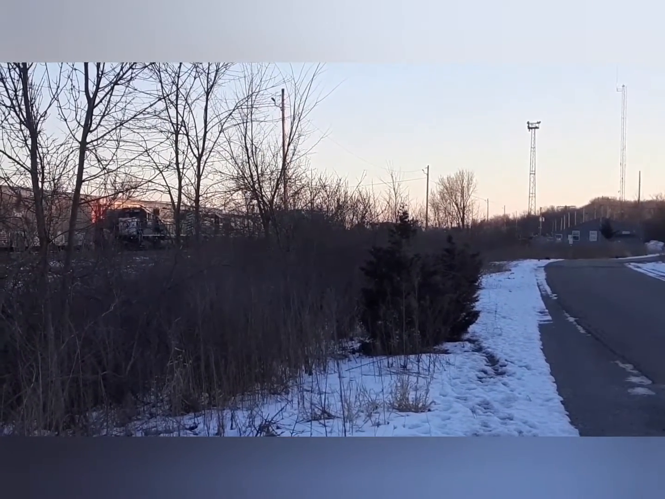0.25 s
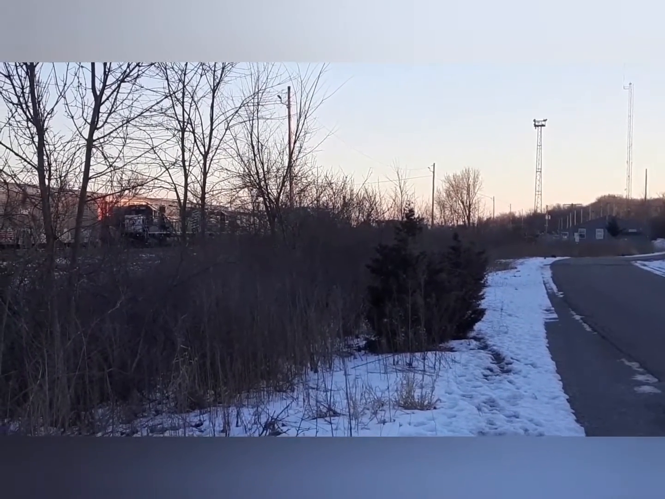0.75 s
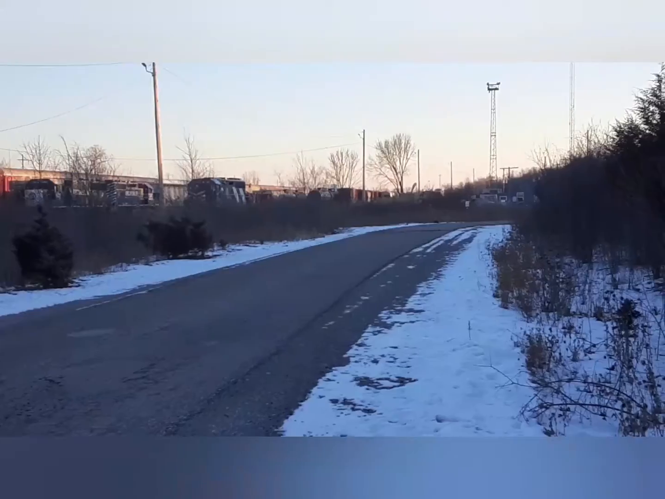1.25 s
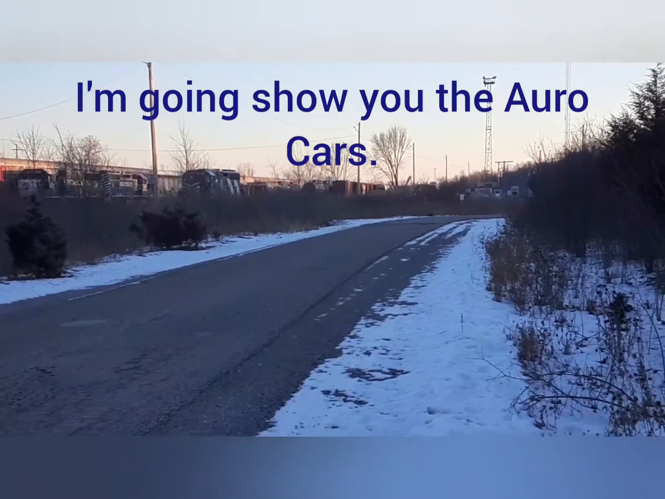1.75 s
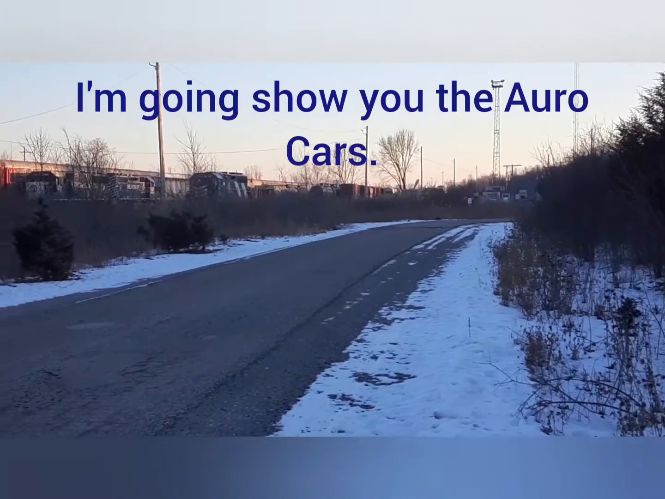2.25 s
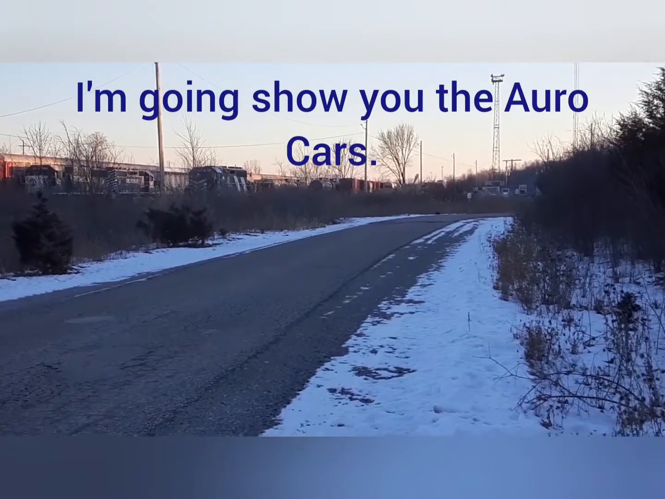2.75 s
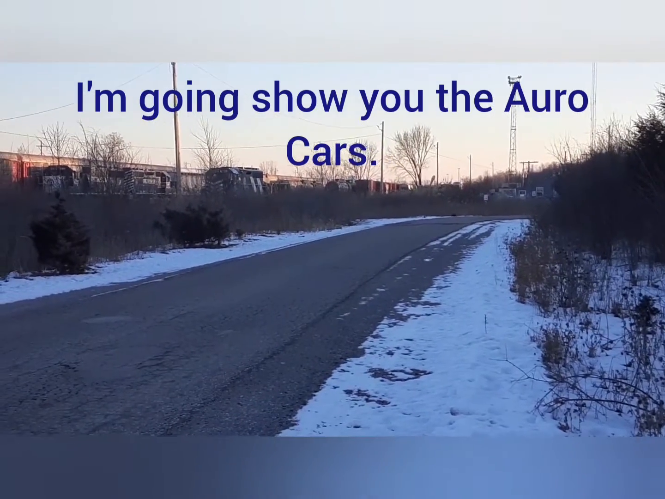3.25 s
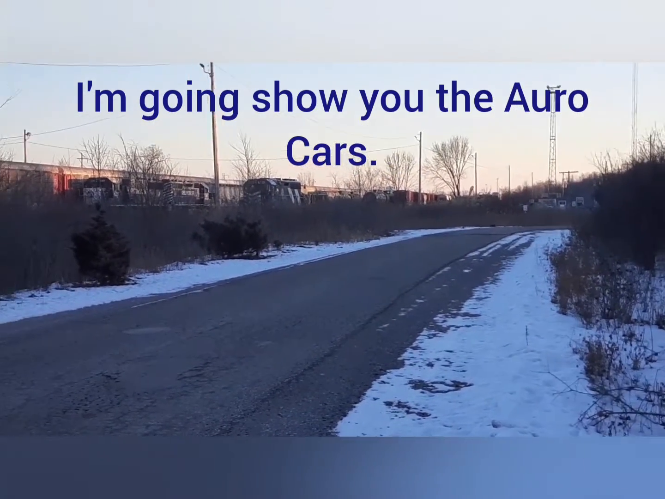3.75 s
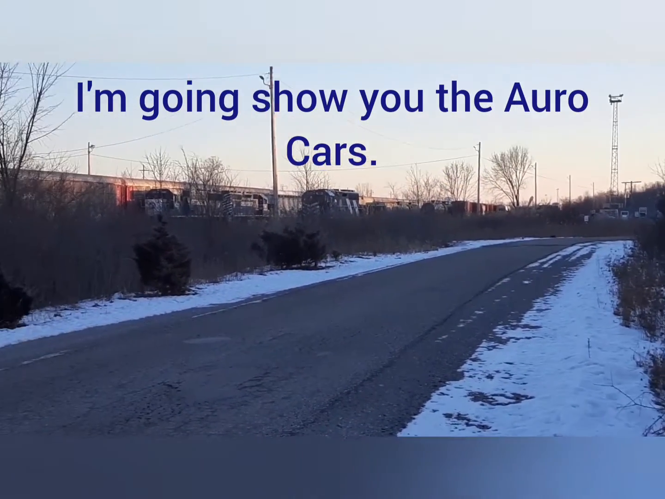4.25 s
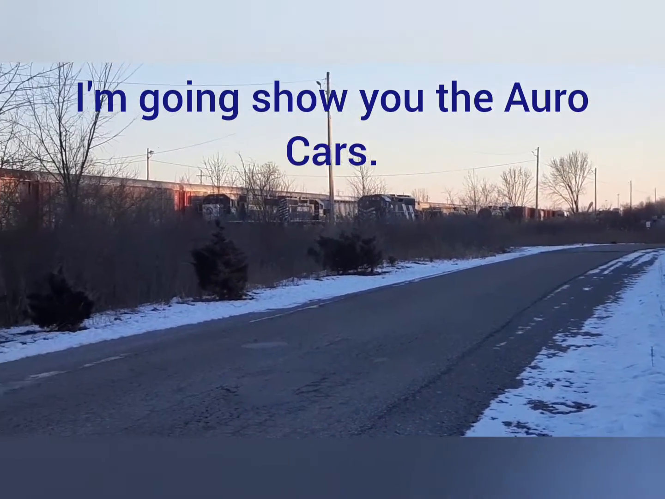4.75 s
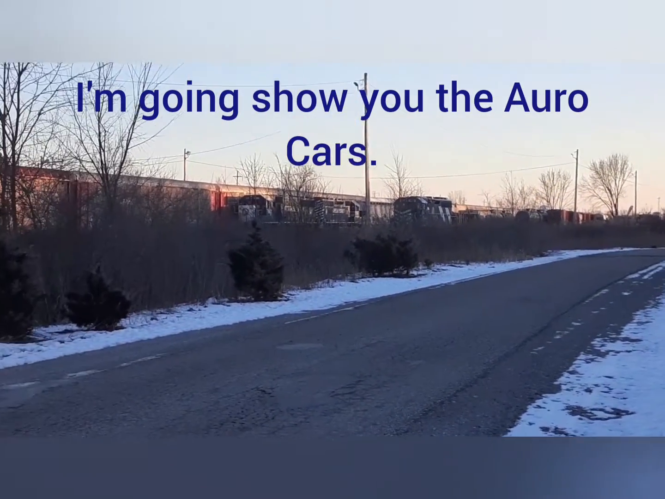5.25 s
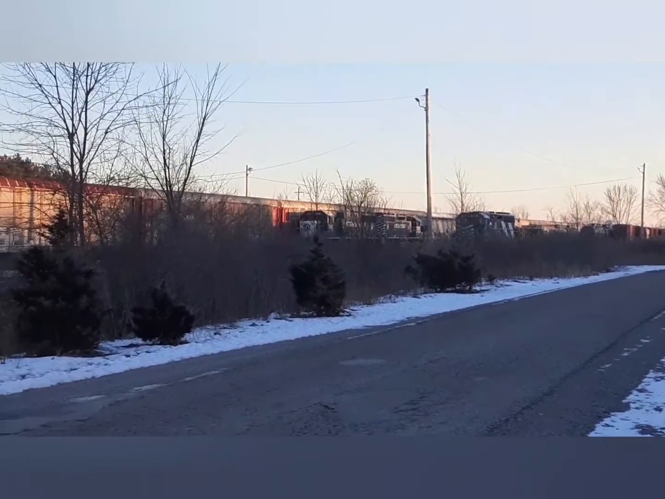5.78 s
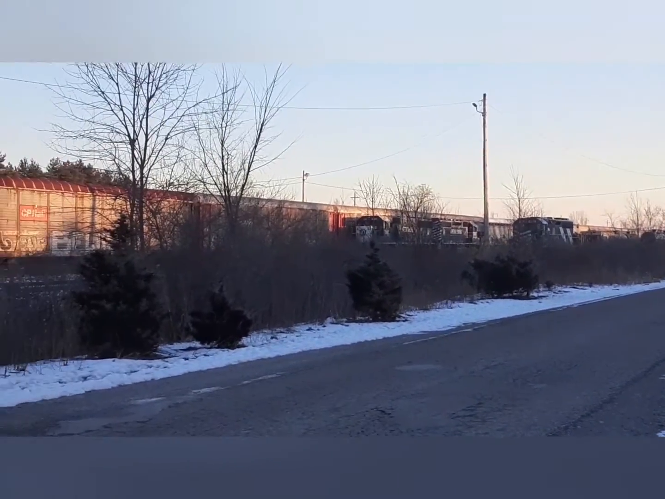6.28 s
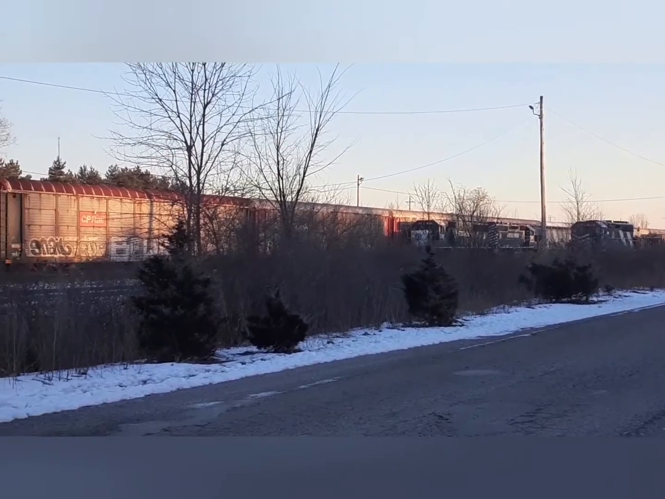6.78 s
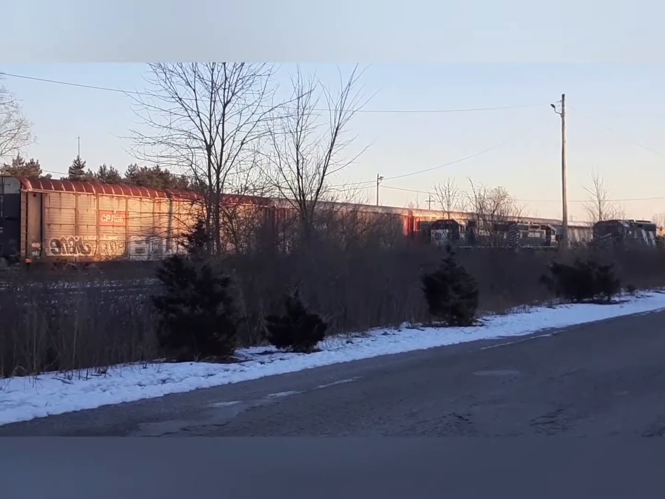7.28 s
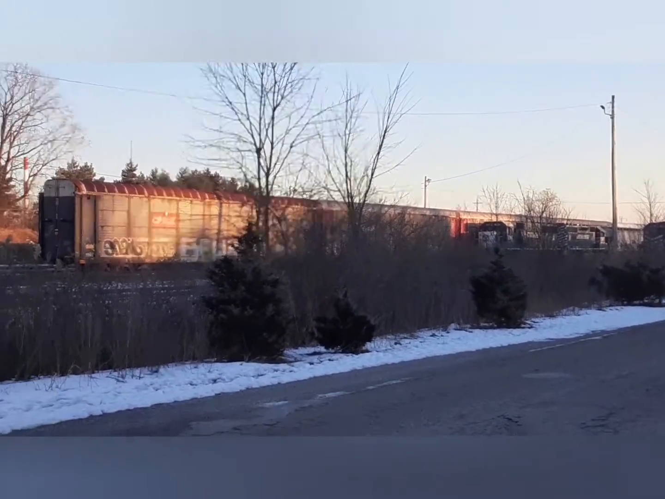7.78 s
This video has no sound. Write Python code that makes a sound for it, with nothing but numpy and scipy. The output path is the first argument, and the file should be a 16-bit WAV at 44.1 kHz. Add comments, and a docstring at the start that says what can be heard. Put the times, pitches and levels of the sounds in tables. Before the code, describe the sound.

Two diesel locomotives idle some way off with a deep, beating throb, light clatter and thin high whines.

```python
"""Two diesel locomotives idling in an open rail yard

Some way off, their exhaust notes beat against each other in a slow throb, the stacks bark and the
firings clatter. Gears, turbocharger, blower, alternator and pump whine over a rush of cooling air.
The microphone listens from one spot, then from a second, where it slowly turns."""
import sys
import numpy as np
from scipy import signal
from scipy.fft import rfft, irfft, next_fast_len
from scipy.io import wavfile

SR = 44100
rng = np.random.default_rng(int(sys.argv[2]) if len(sys.argv) > 2 else 0)


def wav_record(signal):
    """Record a signal, one row per channel, as 16-bit PCM in the file named by sys.argv[1]."""
    frames = np.transpose(np.atleast_2d(signal))
    bounded = np.clip(frames, -1, 1)
    # unit amplitude maps onto the largest positive 16-bit level
    quanta = np.round(bounded * 32767).astype(np.int16)
    wavfile.write(sys.argv[1], SR, quanta)


N = 353682

FAST_CRANK_HZ, SLOW_CRANK_HZ = 6.3212, 5.3108
JUMP_S, BLEND_S, TURN_S = 1.25, .08, 3.5   # the microphone changes spot, later starts to turn
OPENING_DB, OPENING_RISE_S = -3, (.42, .488)


def from_db(db):
    """Decibels to gain."""
    return 10 ** (np.asarray(db) / 20)


def rms_one(x):
    """Scale to rms 1."""
    return x / np.sqrt(np.mean(np.abs(x) ** 2) + 1e-20)


def seconds():
    """The time of every sample."""
    return np.arange(N) / SR


def in_time(rows):
    """One curve for each column after the time."""
    s, *columns = np.transpose(rows)
    return [np.interp(seconds(), s, c) for c in columns]


def swell(s, half_s):
    """A bell-shaped rise and fall of height 1."""
    return np.exp(-((seconds() - s) / half_s) ** 2)


def drift(rate):
    """A random wander of rms 1, changing about rate times a second."""
    pole = np.exp(-40 * np.pi * rate / SR)
    slow = signal.lfilter([1], [1, -2 * pole, pole * pole], rng.standard_normal(N // 20 + 4002))[4000:]
    return np.interp(np.arange(N) / 20, np.arange(len(slow)), rms_one(slow))


def on_bins(points):
    """A table over log frequency, read at every spectral bin."""
    hz, value = np.transpose(points)
    bins = np.fft.rfftfreq(next_fast_len(N), 1 / SR)
    return np.interp(np.log(bins + 1), np.log(hz), value)


def coloured(x, spectrum):
    """Give a signal a spectrum; rms 1."""
    size = next_fast_len(N)
    return rms_one(irfft(rfft(x, size) * from_db(on_bins(spectrum)), size)[..., :N])


def arrived():
    """0 at the first spot, 1 at the second."""
    return np.interp(seconds(), [JUMP_S, JUMP_S + BLEND_S], [0, 1])


def turned():
    """How far the microphone has turned, 0-1."""
    return np.interp(seconds(), [TURN_S, N / SR], [0, 1])


def heard(at_mic, lateness=1):
    """Level and pan (left over right) in dB from three rows: first spot, second spot, end of the turn."""
    first, second, last = np.array(at_mic)[:, :, None]
    level_db, pan_db = first + (second - first) * arrived() + (last - second) * turned() ** lateness
    return level_db + np.interp(seconds(), OPENING_RISE_S, [OPENING_DB, 0]), pan_db


def panned(x, pan_db):
    """Share a level difference between left and right."""
    return x * from_db(pan_db * np.array([[.5], [-.5]]))


def placed(x, at_mic, rise_db=0, lateness=1):
    """Set a sound's level and side at the microphone, with a passing rise on top."""
    level_db, pan_db = heard(at_mic, lateness)
    return panned(x * from_db(level_db + rise_db), pan_db)


def lagged(pair, lag_ms):
    """Sound reaches the left of the microphone later by lag_ms."""
    t = seconds()
    return np.array([np.interp(t - lag_ms / 1000, t, pair[0]), pair[1]])


# the yard's diffuse sound, left against right (frequency [Hz], likeness [0-1])
LIKENESS = [(60, 0.63), (160, 0.94), (290, 0.86), (640, 0.83), (1400, 0.26), (3000, 0.5), (7000, 0.48),
            (15000, 0)]


def diffuse():
    """White noise from all round, alike on both sides in the bass, less so in the treble."""
    size, alike = next_fast_len(N), np.clip(on_bins(LIKENESS), 0, 1)
    mid, side = rfft(rng.standard_normal((2, size)))
    pair = np.sqrt(1 + alike) * mid + np.sqrt(1 - alike) * side * [[1], [-1]]
    return rms_one(irfft(pair, size)[:, :N])


# swells of the treble (time [s], half length [s], rise [dB])
SWELLS = [(1.8, 0.43, 3.5), (7.1, 0.59, 5)]


def treble_swells():
    """The treble comes up twice; its rise in dB."""
    return sum(db * swell(s, half_s) for s, half_s, db in SWELLS)


# microphone hiss (frequency [Hz], level [dB]) and its balance (level [dB], pan [dB])
HISS = [(7000, -37), (9800, -20), (11000, -8.5), (13500, -7.5), (15700, -3.5), (17000, -2)]
HISS_AT_MIC = [(-58.5, -1), (-57.5, -3), (-59, -6.5)]


def microphone_hiss(treble_db):
    """Thin noise at the very top, behind everything."""
    return placed(coloured(diffuse(), HISS), HISS_AT_MIC, treble_db)


# cooling air and its thin top (frequency [Hz], level [dB]); at the microphone (level [dB], pan [dB])
AIR = [(900, 3), (1800, 0.5), (2100, 8), (2400, 0.5), (2750, 1.5), (3500, 0), (4300, -1), (5100, -2),
       (6000, -2), (6500, -16.5), (7400, -26), (8300, -41), (9500, -52), (12000, -39)]
SIZZLE = [(4500, -5), (5800, -13.5), (6500, 2.5), (7400, 5.5), (8300, -8.5), (9500, -15), (12000, -34)]
AIR_AT_MIC = [(-54, -1.5), (-52, 0), (-48.5, -3)]
SIZZLE_AT_MIC = [(-70, 14), (-66, 6), (-65.5, 5)]


def cooling_air(treble_db):
    """Moving air rushes smoothly across the yard."""
    rush = placed(coloured(diffuse(), AIR), AIR_AT_MIC, lateness=4)
    return rush + placed(coloured(diffuse(), SIZZLE), SIZZLE_AT_MIC, .85 * treble_db)


# faint rasps nearby (time [s], half length [s], pitch [Hz], level [dB])
RASPS = [(.16, 0.15, 2530, -57.5), (0.346, 0.052, 2600, -54.5), (.8, 0.038, 2530, -54),
         (1.12, 0.32, 3020, -62)]


def rasps(width_hz):
    """Short swells of narrow noise."""
    out = np.zeros((2, N))
    for s, half_s, hz, db in RASPS:
        band = signal.butter(2, [hz - width_hz / 2, hz + width_hz / 2], "band", fs=SR, output="sos")
        out += from_db(db) * swell(s, half_s) * rms_one(signal.sosfilt(band, rng.standard_normal((2, N))))
    return out


# a short click as the listening spot changes, and a like one later (time [s], unfiltered level [dB])
TICKS = [(1.27, -35), (4.037, -35)]


def ticks(decay_s):
    """Very short, dull cracks."""
    out = np.zeros(N)
    for s, db in TICKS:
        age = seconds() - s
        out += from_db(db) * (age >= 0) * np.exp(-np.abs(age) / decay_s) * rng.standard_normal(N)
    return signal.sosfilt(signal.butter(2, [1100, 3000], "band", fs=SR, output="sos"), out)


def whine(tones, level_db, pan_db, lag_ms, steady, scatter):
    """Tones that waver over their line width; scattered paths make each side flutter on its own."""
    out, t = np.zeros((2, N)), seconds()
    arrival = np.array([t - lag_ms / 1000, t])
    flutter = 1 + scatter * np.array([drift(15) + 1j * drift(12) for side in range(2)])
    for hz, db, width in tones:
        clean = steady / width   # narrow lines are nearly pure, wide ones are a rush
        wavering = rms_one(clean + drift(width * .54) + 1j * drift(width * 1.25)) * rms_one(flutter)
        phase = 2 * np.pi * (hz * arrival % 1)
        out += from_db(db) * (wavering.real * np.cos(phase) - wavering.imag * np.sin(phase))
    return np.sqrt(2) * panned(out * from_db(level_db), pan_db)


# pump tones (pitch [Hz], level [dB], width [Hz]); at the microphone (level [dB], pan [dB])
PUMP_TONES = [(1499.5, -5, 6), (1533, -6.5, 7), (1525, -4, 170), (1680, -15, 12)]
PUMP_AT_MIC = [(-53.5, 2.4), (-52.7, 2.5), (-49, 2)]


def pump(lag_ms):
    """The pump whines on close tones in a narrow rush."""
    return whine(PUMP_TONES, *heard(PUMP_AT_MIC), lag_ms - .03, steady=21, scatter=.093)


# alternator tones (pitch [Hz], level [dB], width [Hz]); at the microphone (level [dB], pan [dB])
ALTERNATOR_TONES = [(999, -1, 3), (1259, -11, 9), (3505, -23, 4)]
ALTERNATOR_AT_MIC = [(-50.5, 3), (-47.5, 1), (-54, 4)]


def alternator(lag_ms):
    """A nearly pure whine that fades as the microphone turns."""
    return whine(ALTERNATOR_TONES, *heard(ALTERNATOR_AT_MIC), 2 * lag_ms - .15, steady=22, scatter=.11)


# blower tones (pitch [Hz], level [dB], width [Hz])
BLOWER_TONES = [(1824, -.5, 2)]
BLOWER_OVERTONES = [(2736, -3.5, 2), (3648, -6.5, 2), (2750, -1, 260)]
# at the microphone: its note (level [dB], pan [dB]), its overtones (time [s], level [dB], pan [dB])
BLOWER_AT_MIC = [(-60, 0), (-63.5, 2), (-53.5, 13)]
OVERTONE_LEVEL = [(0, -73.5, -6), (1.8, -64.0, -2), (3.5, -59.5, 1), (6.1, -68.5, -7), (7.3, -58, -3.5),
                  (8.02, -58, -2)]


def blower(lag_ms):
    """The blower's note grows on the left with the turn; its overtones come and go."""
    note = whine(BLOWER_TONES, *heard(BLOWER_AT_MIC, lateness=.6), lag_ms + .13, steady=16, scatter=.1)
    return note + whine(BLOWER_OVERTONES, *in_time(OVERTONE_LEVEL), lag_ms + .047, steady=8.1, scatter=.16)


# turbocharger tones (pitch [Hz], level [dB], width [Hz]); at the microphone (level [dB], pan [dB])
TURBO_TONES = [(4511, -8, 12), (4555, -10.5, 9), (4500, -5, 110), (6042, -19, 5), (7073, -19.5, 4)]
TURBO_AT_MIC = [(-55, -3), (-58.5, -2), (-53.5, -5)]


def turbocharger(lag_ms):
    """A high whistle that fades in and out by chance."""
    level_db, pan_db = heard(TURBO_AT_MIC)
    return whine(TURBO_TONES, level_db + 2.4 * drift(1.5), pan_db, lag_ms - .04, steady=16, scatter=.14)


# gear tones and their octave (pitch [Hz], level [dB], width [Hz])
GEAR_TONES = [(5358, 1, 2), (5307.5, -9.5, 3), (5408.5, -17, 5), (5256, -19, 6), (5350, -7, 110)]
GEAR_OCTAVE = [(10716, -6, 5), (10716, -1.5, 150)]
# at the microphone (time [s], level [dB], pan [dB]); their direction (time [s], left lag [ms])
GEAR_LEVEL = [(0, -55.0, 0), (0.55, -58.0, -1), (0.95, -53.0, -2), (1.25, -54.5, -2), (1.6, -48.0, -1),
              (2.15, -44.0, -1), (2.55, -50.5, 2), (3.6, -53.0, -3), (4.45, -48.0, 0), (5.4, -50.5, 2),
              (6.15, -46.5, 2), (6.6, -50.5, -7), (7.05, -43.5, -6), (7.6, -43.5, -9), (8.02, -49.5, -14)]
GEAR_LAG = [(0, -.06), (2.3, -.04), (2.7, -.14), (3.7, -.11), (4.1, .01), (8.02, .135)]


def gears(lag_ms, treble_db):
    """The gear whine swells, fades and wanders in direction, with a faint octave above."""
    level_db, pan_db = in_time(GEAR_LEVEL)
    note = whine(GEAR_TONES, level_db, pan_db, *in_time(GEAR_LAG), steady=8.4, scatter=.3)
    octave_db = level_db - 21 + .34 * treble_db
    return note + whine(GEAR_OCTAVE, octave_db, 2.5, lag_ms + .027, steady=9.6, scatter=.31)


def crank(hz, starts_s, hunt):
    """Crank angle in turns as heard at each spot; the governor lets it run slightly ahead and behind."""
    return hz * (seconds() - np.array(starts_s)[:, None]) + hunt * drift(1.5)


def firings(angle, crank_hz, uneven_db, decay, fresh, count):
    """Each cylinder fires a burst that is the same on every turn, mixed with fresh turbulence."""
    slot = angle % 1 * count
    strength = from_db(uneven_db * rms_one(rng.standard_normal(count)))[slot.astype(int) % count]
    burst = strength * np.exp(-(slot % 1) / decay)
    one_turn = rng.standard_normal(int(SR / crank_hz))
    repeating = one_turn[(angle % 1 * (len(one_turn) - 1)).astype(int)]
    return rms_one(burst * (repeating + fresh * diffuse()))


# block clatter (frequency [Hz], level [dB]); at the microphone (level [dB], pan [dB])
CLATTER = [(250, -16), (400, -8.5), (490, -2.5), (590, -2), (660, 0.5), (720, -0.5), (800, -5.5),
           (950, -10.5), (1130, -16), (1330, -16.5), (1520, -15), (1680, -22.5), (1850, -26), (3000, -65.5)]
CLATTER_AT_MIC = [(-38.5, 1), (-39.5, 2.1), (-40, 1.7)]
# firing harmonics that ring in the blocks (pitch [Hz], level [dB], width [Hz])
BLOCK_TONES = [(540, -4, 9), (657.5, 0, 4), (714, -.5, 8), (765, -3, 6), (840, -7, 5)]


def block_clatter(fast, slow, ring_db):
    """The firings rattle both engine blocks and set them ringing."""
    knocks = firings(fast, FAST_CRANK_HZ, uneven_db=0, decay=7, fresh=.78, count=8)
    knocks += firings(slow, SLOW_CRANK_HZ, uneven_db=.4, decay=1.8, fresh=1.33, count=16)
    level_db, pan_db = heard(CLATTER_AT_MIC)
    ring = whine(BLOCK_TONES, level_db + ring_db, pan_db, lag_ms=0, steady=4.6, scatter=.16)
    return placed(coloured(knocks, CLATTER), CLATTER_AT_MIC) + ring


# heavy chuffs at the first spot (time [s], note rise [dB], bark rise [dB])
CHUFFS = [(.02, 7, 2), (.115, 5, 5), (.312, 7, 10), (.623, 4, 5), (.702, 5, 8), (.765, 6, 6), (.793, 7, 11),
          (.843, 5, 7), (.896, 5, 7), (1.075, 3, 12), (1.106, 7, 10)]


def chuffs(half_s):
    """A heavy chuff briefly lifts the exhaust note and the bark; both rises in dB."""
    return sum(np.outer([note_db, bark_db], swell(s, half_s)) for s, note_db, bark_db in CHUFFS)


# bark of the stacks (frequency [Hz], level [dB]); at the microphone (level [dB], pan [dB])
BARK = [(20, -12), (45, -6), (80, 8.5), (125, 0), (170, 0), (215, -1.5), (270, -0.5), (350, -8), (450, -17),
        (900, -74.5)]
BARK_AT_MIC = [(-45.5, 12), (-39, 1.5), (-38, 2.2)]


def stack_bark(fast, slow, rise_db):
    """Uneven firings leave both stacks as low, rough puffs."""
    puffs = firings(fast, FAST_CRANK_HZ, uneven_db=4, decay=1, fresh=.78, count=8)
    puffs += from_db(.5) * firings(slow, SLOW_CRANK_HZ, uneven_db=2, decay=.98, fresh=1, count=8)
    return placed(coloured(puffs, BARK), BARK_AT_MIC, rise_db)


def exhaust(angles, orders, smear):
    """Uneven cylinders sound multiples of the crank speed; the silencer smears the puffs round the turn."""
    multiple, db = np.transpose(orders)
    behind = smear * (multiple - multiple[db.argmax()]) ** 2
    notes = (from_db(d) * np.cos(2 * np.pi * (k * angles - b)) for k, d, b in zip(multiple, db, behind))
    first_spot, second_spot = np.sqrt(2) * sum(notes)
    return first_spot + (second_spot - first_spot) * arrived()


# each exhaust's notes (multiple of crank speed, level [dB]); at the microphone (level [dB], pan [dB])
FAST_ORDERS = [(8, -37), (9, -42), (10, -45), (11, -40), (12, -49), (13, -33), (14, -55), (15, -39),
               (16, -47), (17, -45), (19, -53), (21, -56), (23, -56), (24, -48), (26, -49), (27, -56)]
SLOW_ORDERS = [(8, -46), (9, -53), (10, -55), (12, -51), (13, -41), (14, -45), (15, -29), (16, -43),
               (17, -38), (18, -50), (21, -49), (23, -55), (24, -53), (25, -56)]
FAST_AT_MIC = [(-5.7, 0), (.7, 2.3), (.2, 2.3)]
SLOW_AT_MIC = [(-7, 0), (.4, 2.3), (.9, 2.3)]


def exhaust_throb(fast, slow, rise_db):
    """Some way off, two exhausts at different speeds beat against each other."""
    fast_note = placed(exhaust(fast, FAST_ORDERS, smear=.32), FAST_AT_MIC, rise_db)
    return fast_note + placed(exhaust(slow, SLOW_ORDERS, smear=.085), SLOW_AT_MIC, rise_db)


def scene():
    """Engines, whines and cooling air in the open, over the hiss of the microphone."""
    lag_ms = np.interp(turned(), [0, 1], [-.044, .15])   # the left side's lag follows the turn
    treble_db = treble_swells()
    air, hiss = cooling_air(treble_db), microphone_hiss(treble_db)
    fast = crank(FAST_CRANK_HZ, starts_s=(.1515, .0544), hunt=.00033)
    slow = crank(SLOW_CRANK_HZ, starts_s=(.1757, .1017), hunt=.00067)
    note_rise_db, bark_rise_db = chuffs(half_s=.014)
    engines = exhaust_throb(fast, slow, note_rise_db) + stack_bark(fast[1], slow[1], bark_rise_db)
    engines += block_clatter(fast[1], slow[1], ring_db=-13)
    whines = gears(lag_ms, treble_db) + turbocharger(lag_ms) + blower(lag_ms)
    whines += alternator(lag_ms) + pump(lag_ms)
    return hiss + rasps(width_hz=210) + ticks(decay_s=.0072) + whines + lagged(air + engines, lag_ms)


def record(dry):
    """The top is cut steeply above 15850 Hz."""
    return signal.sosfilt(signal.ellip(12, .1, 80, 15850, fs=SR, output="sos"), dry)


dry = scene()
out = record(dry)
wav_record(out)
```